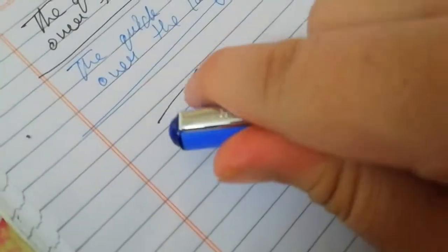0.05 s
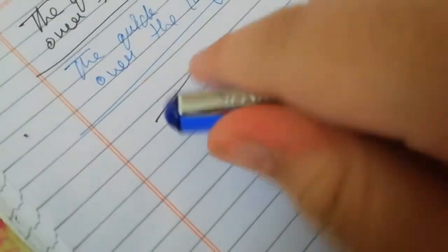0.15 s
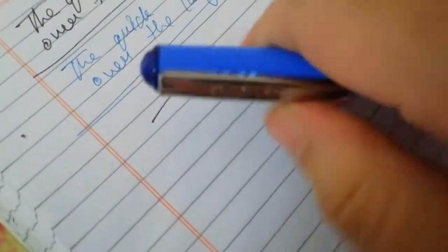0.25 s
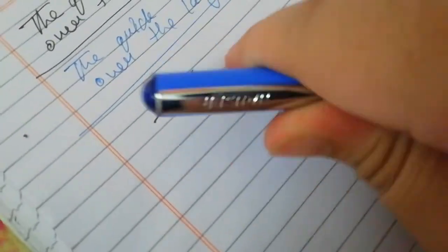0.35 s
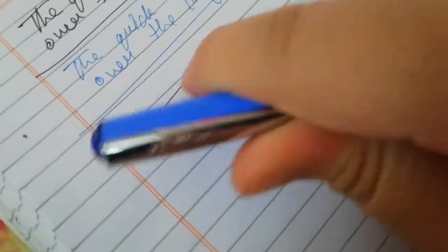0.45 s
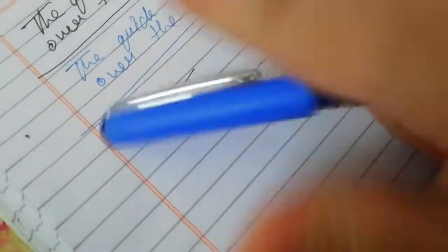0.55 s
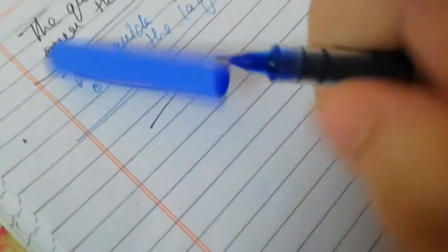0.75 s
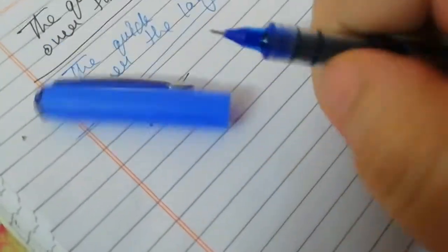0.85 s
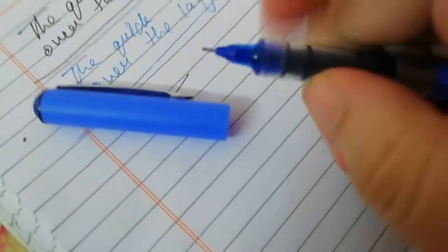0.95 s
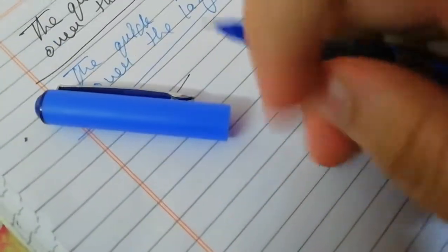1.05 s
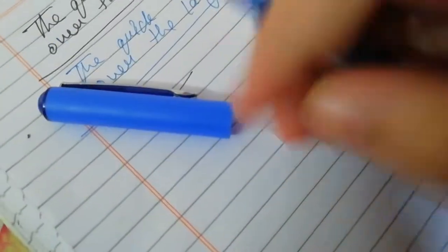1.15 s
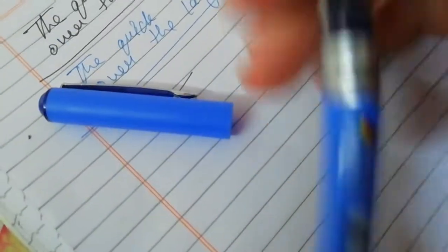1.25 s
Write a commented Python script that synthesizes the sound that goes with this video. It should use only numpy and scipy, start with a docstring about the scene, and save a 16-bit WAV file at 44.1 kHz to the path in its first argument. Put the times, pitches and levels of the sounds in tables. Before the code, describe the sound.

A plastic pen cap snaps off sharply, then drops and rattles on a notebook.

```python
"""A plastic pen cap is worked off its barrel close to the left port of a phone's stereo microphone.
It slides and squeaks, then snaps free with a sharp crack and a low thump as the hands recoil.
The cap drops on a notebook and rattles with its metal clip, while a hand bumps and rubs over the paper.
The right port hears the pen later and duller; the small room rings briefly behind the clicks."""
import sys
import numpy as np
from scipy import signal
from scipy.fft import rfft, irfft
from scipy.io import wavfile

SR = 44100
rng = np.random.default_rng(int(sys.argv[2]) if len(sys.argv) > 2 else 0)


def wrap_up_sound(samples):
    """Save the sound to the file named by the first command line argument, as 16-bit audio."""
    columns = np.atleast_2d(samples).T
    # keep every value between -1 and 1, then stretch to whole-number steps
    tamed = np.clip(columns, -1, 1)
    steps = np.round(tamed * 32767).astype(np.int16)
    wavfile.write(sys.argv[1], SR, steps)


N = 57330

# Tone colours at the microphone. Each row: frequency in Hz, relative level in dB.
FLOOR_COLOUR = [(30, 14), (120, -10.5), (300, 7.5), (450, -5), (800, -6.5), (1050, -1), (1400, -6),
                (3000, -9.5), (5200, -14.5), (8000, -19.5), (11000, -15.5), (15000, -11.5), (16000, -45)]  # room tone and microphone hiss
ROOM_COLOUR = [(200, -4), (700, -3), (2000, -0.5), (3500, 1.5), (5200, 7), (7000, 4.5), (9000, 13),
               (11000, 8), (14800, 1), (16000, -7)]  # reflections from desk and walls
PHONE_SHADE = [(100, 0.5), (500, -2.5), (1000, -11.5), (2500, -17), (4000, -22.5), (8000, -17),
               (14000, -39)]  # the phone's body shields the far port
RUMBLE_COLOUR = [(10, -11.5), (25, 6.5), (55, -4.5), (90, -11.5), (160, -20), (400, -39.5), (3000, -100)]
RUB_COLOUR = [(40, -15), (90, -2.5), (150, 1.5), (210, -7.5), (290, -15.5), (400, -31.5), (700, -35),
              (2000, -85), (12000, -100)]
SWISH_COLOUR = [(100, -25), (300, 4.5), (450, -5.5), (700, -3), (1100, -6.5), (1500, -27.5), (3000, -34),
                (12000, -56)]
HISS_COLOUR = [(2000, -43), (6000, -11.5), (8000, -19), (9300, -13.5), (10000, -3), (11300, -6),
               (12600, -1.5), (14800, 2), (15600, 0.5), (16000, -30)]
SCRAPE_COLOUR = [(200, -4), (800, -3.5), (1600, 1), (2300, -2.5), (3300, 0.5), (4200, -1.5), (5200, 1),
                 (6200, -8), (7200, -10), (8300, -12.5), (16000, -46)]
ZIP_COLOUR = [(700, -4.5), (2000, -13), (4000, -26), (8000, -5), (11000, -7), (14500, 5.5), (15700, -5),
              (16300, -25)]
TICK_COLOUR = [(300, -35), (1500, -2), (2900, 7), (4500, -5), (5500, -1), (7000, -10.5), (9300, -4),
               (10500, 2.5), (15200, 0.5), (16500, -22)]
CRACK_COLOUR = [(200, -30.5), (500, -4.5), (750, 3.5), (1100, 2.5), (1650, 11), (2900, 5.5), (3800, 0),
                (5200, -1.5), (6000, -14.5), (9300, -16), (11500, -0.5), (15000, -17), (17000, -24)]

# Friction swelling and fading. Each row: time in seconds, level in dB.
RUMBLE_LEVELS = [(0, -34.5), (.05, -57.5), (.17, -42), (.26, -38.5), (.3, -36), (.34, -37), (.43, -37.5),
                 (.49, -49.5), (.64, -54.5), (.7, -31), (.79, -41), (.89, -35), (.95, -39.5), (1.1, -50),
                 (1.3, -52.5)]  # bass of the hand dragging on the notebook
RUB_LEVELS = [(0, -35), (.03, -75), (.13, -69.5), (.2, -45.5), (.27, -34.5), (.31, -52), (.34, -41),
              (.4, -32.5), (.44, -43.5), (.48, -79), (.63, -78), (.71, -43.5), (.75, -34), (.81, -36),
              (.9, -40), (.97, -45.5), (1.1, -44), (1.14, -48), (1.18, -67), (1.3, -72)]  # its dull rubbing
SWISH_LEVELS = [(0, -65), (.16, -89), (.27, -69), (.32, -67), (.4, -60), (.48, -83), (.68, -74), (.78, -53),
                (.95, -57), (1.03, -55), (1.13, -50), (1.18, -74), (1.3, -75)]  # skin on paper
HISS_LEVELS = [(0, -64), (.17, -99), (.195, -55.5), (.22, -47), (.25, -55), (.29, -54.5), (.33, -75.5),
               (.375, -53.5), (.41, -56.5), (.46, -64), (.51, -65.5), (.54, -54.5), (.56, -63), (.68, -60),
               (.86, -59), (.97, -70.5), (1.02, -76), (1.09, -74.5), (1.12, -57.5), (1.15, -78), (1.2, -67),
               (1.26, -52.5), (1.3, -49)]  # treble of the sliding plastic
SCRAPE_LEVELS = [(0, -57), (.06, -68), (.095, -78), (.16, -71), (.21, -71), (.28, -56), (.33, -70),
                 (.37, -64), (.45, -59), (.53, -70.5), (.61, -63), (.72, -62.5), (.8, -59.5), (.9, -66),
                 (1.05, -69), (1.2, -67.5), (1.3, -60.5)]  # its mids

# Struck objects. Each row: frequency in Hz, relative level in dB, seconds to decay by 60 dB.
NOTEBOOK_MODES = [(175, -11, 0.035), (287, 2.5, 0.021), (830, -16.5, 0.015)]
CAP_MODES = [(1770, -10, 0.013), (2420, -12, 0.024), (2526, -3.5, 0.039), (3220, -13, 0.018),
             (4020, -7.5, 0.012), (4610, -6, 0.0092)]
CLIP_MODES = [(6700, -15, 0.0042), (11000, -27, 0.0069), (11700, -5, 0.012), (11980, -6, 0.012),
              (14700, -11, 0.014)]
PEN_MODES = [(1800, -22.5, 0.019), (2790, -22.5, 0.02), (3220, -24.5, 0.011), (5500, -40, 0.0098),
             (6700, -29, 0.0066), (11700, -48, .012), (13770, -23.5, .016), (14100, -43, .024),
             (14700, -25, .018)]  # cap and barrel together

# Soft bumps on the notebook. Each row: start in seconds, level in dB, frequency in Hz.
BUMPS = [(.001, -27.5, 140), (.332, -19.5, 138), (.676, -27.5, 52)]
# Small contacts. Each row: start in seconds, level in dB.
TICKS = [(0.54, -56), (0.539, -47), (.5666, -35), (0.612, -46), (0.912, -47), (0.917, -48), (.936, -47),
         (.991, -48), (1.011, -60), (1.059, -49.5)]
# The cap creeping along the barrel.
# Each row: centre in seconds, half length in seconds, level in dB, main resonance in Hz.
SQUEAKS = [(0.121, 0.0055, -58.5, 2700), (0.213, .017, -53, 3510), (0.28, 0.02, -58, 3660),
           (0.389, .03, -64, 3400)]
# Side resonances of the cap. Each row: frequency in Hz, width in Hz, gain in dB.
CAP_RESONANCES = [(1654, 190, -6.5), (5200, 170, -4.5)]
# The cap falling and rocking on the paper.
# Each row: start in seconds, gains of cap, clip and thud in dB, pitch ratio of the cap.
LANDINGS = [(0.6274, -42.5, -43, -70, 1.07), (0.6323, -55, -31, -77, 1.06), (0.636, -61, -47, -66, 1.1),
            (0.643, -71, -36, -70, 1.2), (.6450, -50, -51, -29, 1.7), (0.6516, -51, -45, -36.5, 1.2),
            (0.6622, -31, -43, -52, 1.01), (0.666, -50.5, -52, -59, 0.69), (0.6761, -36, -50, -37, .97),
            (0.6955, -56, -54, -32.5, 1.3)]


def undb(db):
    """Decibels to gain."""
    return 10 ** (np.asarray(db) / 20)


def colour(x, points, size=4096):
    """Causal filter through (Hz, dB) points."""
    hz, db = np.array(points, float).T
    bins_hz = np.maximum(np.fft.rfftfreq(2 * size, 1 / SR), 1)
    gain = undb(np.interp(np.log(bins_hz), np.log(hz), db))
    cepstrum = irfft(np.log(gain))
    cepstrum[1:size] *= 2  # fold to minimum phase
    cepstrum[size + 1:] = 0
    response = irfft(np.exp(rfft(cepstrum)))[:size]
    return signal.fftconvolve(x, response)[:N]


def grit(grain_db):
    """Dense friction grains of uneven but bounded size."""
    return rng.standard_normal(N) * undb(grain_db * np.clip(rng.standard_normal(N), -2, 2))


def noise(points, grain_db=0):
    """Coloured noise of rms 1; uneven grain sizes make it gritty."""
    x = colour(grit(grain_db), points)
    return x / x.std()


def curve(points):
    """Gain along (s, dB) points."""
    return undb(np.interp(np.arange(N) / SR, *np.array(points).T))


def fade(t, t60):
    """Exponential decay, 60 dB down at t60."""
    return np.exp(-np.log(1000) * t / t60)


def swell(centre_s, width_s):
    """A bell-shaped rise and fall in time."""
    return np.exp(-.5 * ((np.arange(N) / SR - centre_s) / width_s) ** 2)


def place(start, shape, size=4096):
    """A short sound, given as a function of its own time, set at a moment."""
    out = np.zeros(N + size)
    first = int(np.clip(np.ceil(start * SR), 0, N))
    age = np.maximum((first + np.arange(size)) / SR - start, 0)
    out[first:first + size] = shape(age)
    return out[:N]


def ring(start, modes):
    """Damped modes struck at one moment."""
    return place(start, lambda t: sum(
        undb(db) * np.sin(2 * np.pi * hz * t) * fade(t, t60) for hz, db, t60 in modes))


def burst(start, decay_s=0.0014):
    """Envelope of a brief crunch of contact."""
    return place(start, lambda t: np.exp(-t / decay_s))


def resonance(x, hz, width_hz):
    """Steep band-pass resonance, gain 1 at the centre."""
    b, a = signal.iirpeak(hz, hz / (2 * width_hz), fs=SR)
    return signal.lfilter(b, a, signal.lfilter(b, a, x))


def room_tone(level_db=-66):
    """Quiet background of room and microphone, independent at each port."""
    return undb(level_db) * np.array([noise(FLOOR_COLOUR), noise(FLOOR_COLOUR)])


def reflections(x, early_db=-19.5, late_db=-22.5, size=16384):
    """Dense early reflections from the nearby desk and hands, then a faint tail off the walls."""
    t = np.arange(size) / SR
    echoes = noise(ROOM_COLOUR)[:size] * (1 - np.exp(-t / 0.0031))
    early, late = echoes * fade(t, t60=0.048), echoes * fade(t, t60=0.41)
    response = undb(early_db) * early / np.linalg.norm(early)
    response += undb(late_db) * late / np.linalg.norm(late)
    return signal.fftconvolve(x, response)[:N]


def paper_swish(left_db=-9.5):
    """Skin brushing the paper pushes the two ports in opposite directions."""
    ports = np.array([[-undb(left_db)], [1]])
    return curve(SWISH_LEVELS) * noise(SWISH_COLOUR, grain_db=6.5) * ports


def hand_rub(side_db=-10.5):
    """The hand drags on the notebook; rumble and rubbing reach both ports almost alike."""
    mid = noise(RUB_COLOUR)
    side = undb(side_db) * noise(RUB_COLOUR) * np.array([[1], [-1]])
    return curve(RUMBLE_LEVELS) * noise(RUMBLE_COLOUR) + curve(RUB_LEVELS) * (mid + side)


def desk_bumps(attack_s=0.0013, t60=0.034):
    """Dull, padded knocks of hand and cap, carried through the desk."""
    out = 0
    for start, db, hz in BUMPS:
        push = place(start, lambda t: 1 - np.exp(-t / attack_s))
        out += push * ring(start, [(hz, db, t60)])
    return out


def ticks():
    """Light, dry contacts of nib, cap and paper."""
    return noise(TICK_COLOUR) * sum(undb(db) * burst(start) for start, db in TICKS)


def cap_slide(zip_db=-35.5):
    """Fine friction of skin and plastic, with a quick zip as the cap's lip scrapes off the barrel."""
    hiss = curve(HISS_LEVELS) * noise(HISS_COLOUR, grain_db=8)
    scrape = curve(SCRAPE_LEVELS) * noise(SCRAPE_COLOUR, grain_db=6.5)
    lip = undb(zip_db) * swell(centre_s=.4265, width_s=0.0054) * noise(ZIP_COLOUR, grain_db=7)
    return hiss + scrape + lip


def cap_squeaks():
    """Stick-slip grains excite the resonances of the cap in short swells."""
    out, grains = 0, grit(grain_db=3)
    sides = sum(undb(db) * resonance(grains, hz, width) for hz, width, db in CAP_RESONANCES)
    for centre, half_length, db, hz in SQUEAKS:
        squeak = resonance(grains, hz, width_hz=380) + sides
        out += undb(db) * squeak / squeak.std() * swell(centre, half_length)
    return out


def cap_rattle(crunch_db=-7.5):
    """Each landing rings the hollow cap and its clip and thuds; the contact shifts the cap's pitch."""
    out, crunch = 0, undb(crunch_db) * noise(TICK_COLOUR)
    for start, cap_db, clip_db, thud_db, pitch in LANDINGS:
        out += undb(cap_db) * ring(start, [(hz * pitch, db, t60) for hz, db, t60 in CAP_MODES])
        out += undb(clip_db) * ring(start, CLIP_MODES)
        out -= undb(thud_db) * ring(start, NOTEBOOK_MODES)
        out += (undb(cap_db) + undb(clip_db)) * crunch * burst(start)
    return out


def recoil_thump(centre_s=.4263, hz=67.5, gain_db=-13.5):
    """One slow swing of pressure as the hands recoil beside the microphone."""
    t = np.arange(N) / SR - centre_s
    return undb(gain_db) * np.sin(2 * np.pi * hz * t) * swell(centre_s, width_s=0.0034)


def cap_snap(start_s=.41717, crack_db=5.5, rebound_s=.001835, rebound_db=-13.5, size=65536):
    """The catch lets go and knocks again at once: two sharp cracks that ring cap and barrel."""
    blow = undb(crack_db) * colour(signal.unit_impulse(N), CRACK_COLOUR) + ring(0, PEN_MODES)
    delay = -2j * np.pi * np.fft.rfftfreq(size, 1 / SR)  # phase turn per second of delay
    hits = np.exp(delay * start_s) * (1 + undb(rebound_db) * np.exp(delay * rebound_s))
    return -irfft(rfft(blow, size) * hits)[:N]


def scene(far_lag_s=0.000535, desk_lead_s=0.00093):
    """The pen is next to the left port; the right one hears it later and duller."""
    t = np.arange(N) / SR
    clicks = cap_snap() + cap_rattle() + ticks()
    near = clicks + reflections(clicks) + cap_slide() + cap_squeaks()
    far = np.interp(t - far_lag_s, t, colour(near, PHONE_SHADE))
    background = room_tone()
    low_left, low_right = recoil_thump() + desk_bumps() + hand_rub()
    low_right = np.interp(t + desk_lead_s, t, low_right)  # the lows reach the right port first
    return np.array([near + low_left, far + low_right]) + paper_swish() + background


def record(dry, top_hz=16600):
    """The phone cuts the top treble steeply."""
    return signal.sosfilt(signal.ellip(8, .2, 80, top_hz, fs=SR, output="sos"), dry)


dry = scene()
out = record(dry)
wrap_up_sound(out)
```